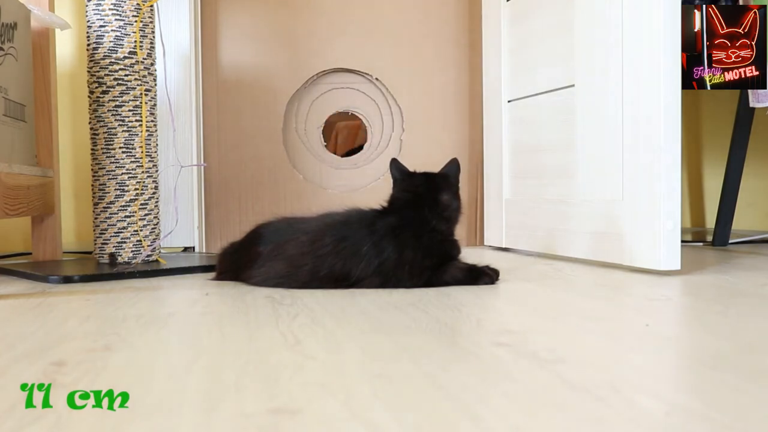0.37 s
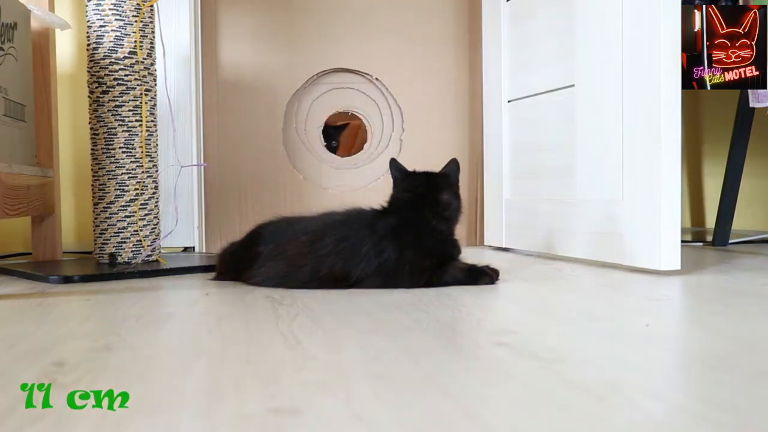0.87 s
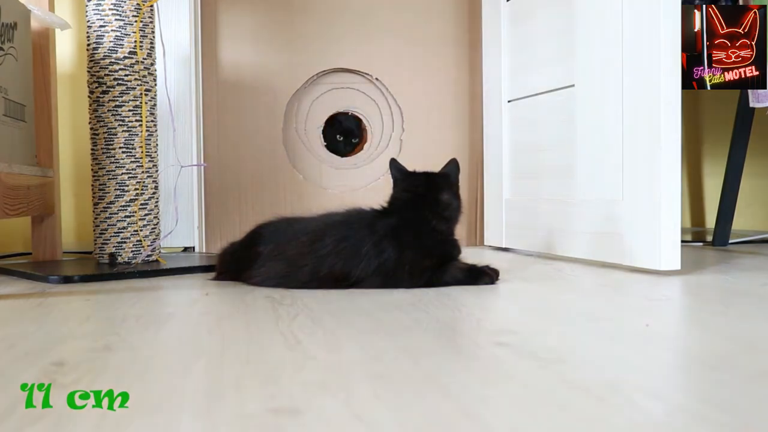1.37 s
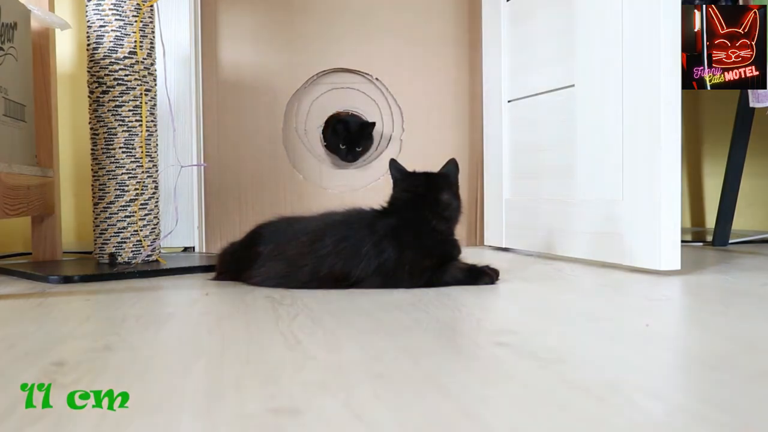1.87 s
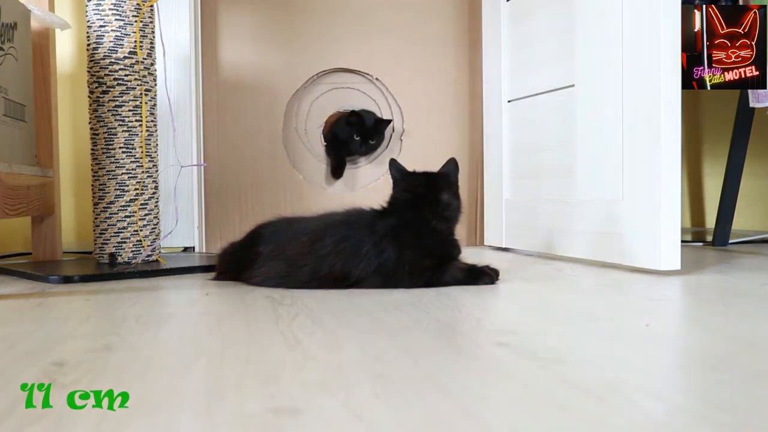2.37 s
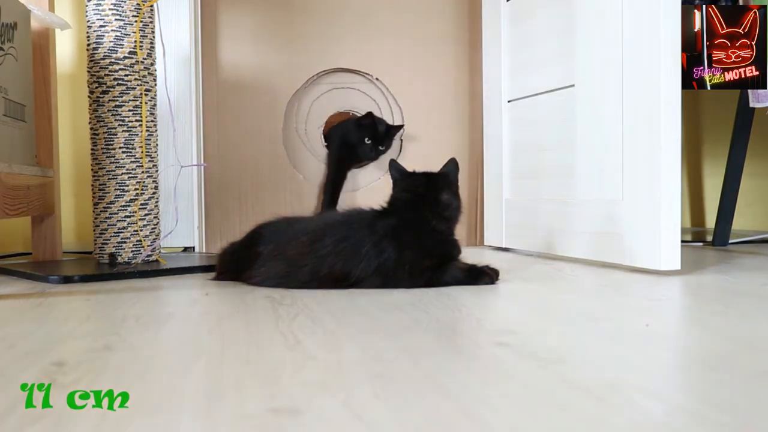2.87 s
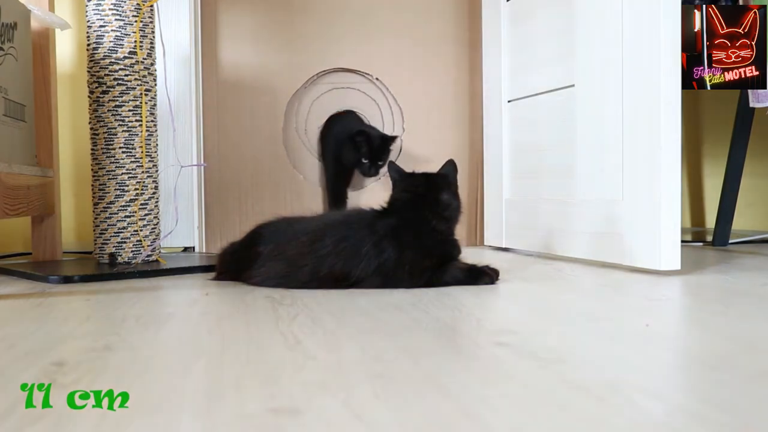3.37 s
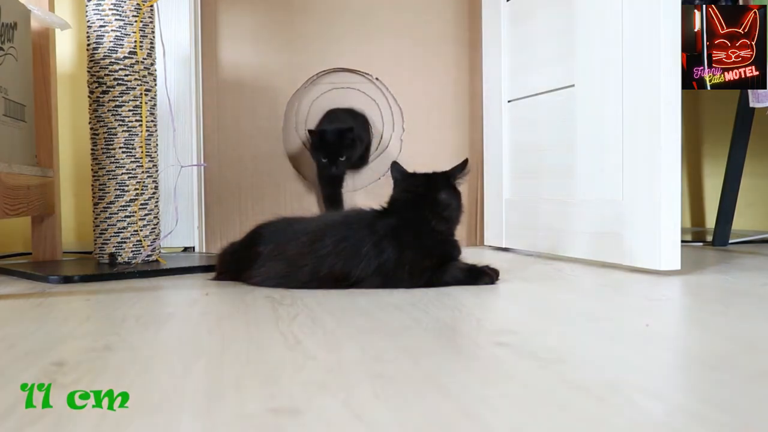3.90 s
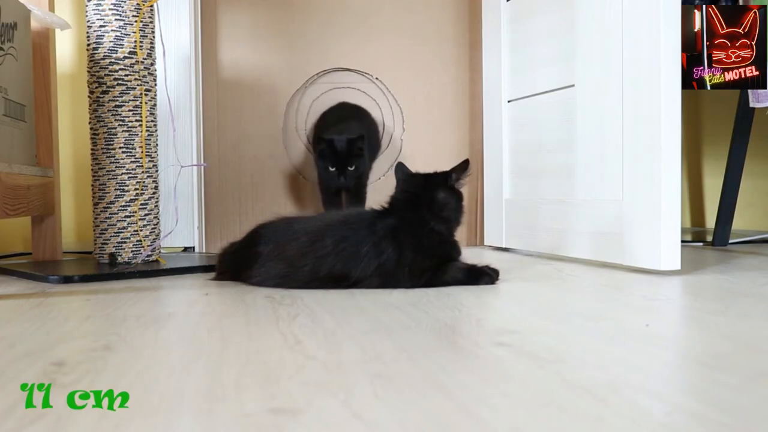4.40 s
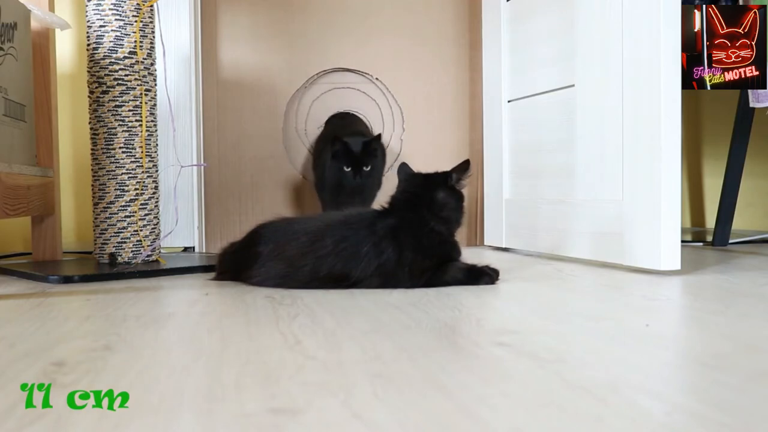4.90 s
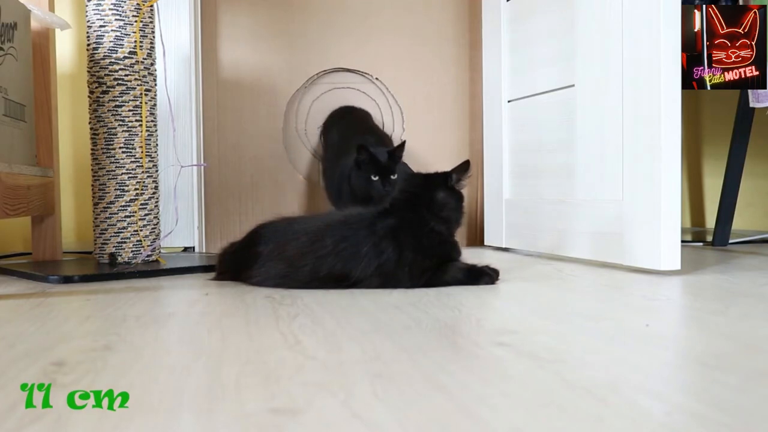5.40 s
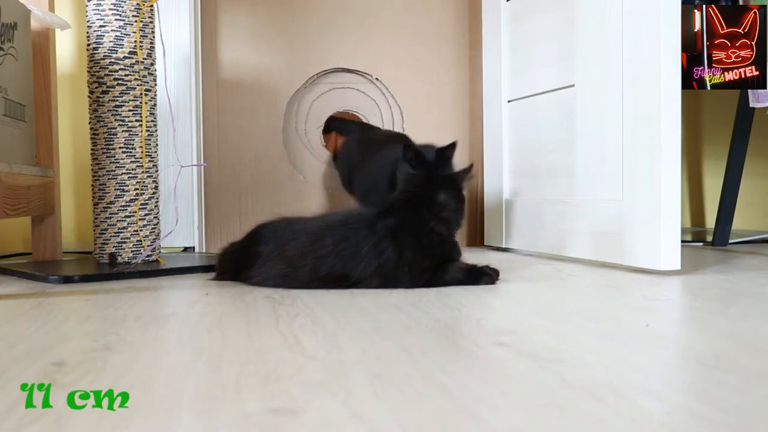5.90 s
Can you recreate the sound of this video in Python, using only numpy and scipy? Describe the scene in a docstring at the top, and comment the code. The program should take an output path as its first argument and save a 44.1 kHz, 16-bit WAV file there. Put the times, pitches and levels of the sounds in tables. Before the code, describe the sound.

A cat squeezes through a tight hole in a cardboard panel. First only soft room tone, tiny ticks and low air movement; then boxy bumps, a quick rasp and a strong hollow knock. Coarse fur and card-edge scraping grows nearly continuous, broken by separate thuds and snapping fibres, ending in a cluster of knocks. Heard indoors from a floor-level stereo microphone, fairly dry.

```python
"""A faint brush of fur in a quiet small room opens into busier rubbing, knocks and ticks: a cat squeezes through
a tight hole in a cardboard panel in a doorway, a metre or two from a stereo microphone on the floor.
The rub is uneven noise from fur, scraped card edge and dragged panel; pushes ring the panel's modes as knocks,
and fibres at the rim tick as short pitched crackles. Behind lie low air swells, panel wobble and room tone."""
import sys
import numpy as np
from scipy import signal
from scipy.fft import rfft, irfft
from scipy.io import wavfile
from scipy.ndimage import uniform_filter1d

SR = 44100
rng = np.random.default_rng(int(sys.argv[2]) if len(sys.argv) > 2 else 0)


def materialize(psi):
    """Save the field psi as 16-bit PCM at rate SR to the path in sys.argv[1].

    A 1-D psi becomes a single channel; in a 2-D psi each row is a channel.
    """
    bounded = np.clip(np.atleast_2d(psi).T, -1, 1)
    quanta = np.round(bounded * 32767).astype(np.int16)
    wavfile.write(sys.argv[1], SR, quanta)


def voltage_ratio(decibels):
    """Convert decibels (scalar or array-like) to amplitude ratios, 20 dB per decade."""
    exponent = np.asarray(decibels, float) / 20
    return 10 ** exponent


N = 265482  # length in samples

# The coat slides over the rim: peak_s, half_length_s, fur_db, scrape_over_fur_db, drag_over_fur_db
COAT_STROKES = [(.15, .2, -70, -10, -5), (0.866, 0.082, -55.5, -7.5, -12), (0.96, .07, -59.5, -13, -5),
                (1.087, 0.027, -58.5, -2, -0.5), (1.306, 0.054, -57, -3.5, -11),
                (1.714, 0.023, -56, -6, -3), (1.848, 0.15, -56.5, -11, -13), (1.984, 0.13, -51, -9.5, -17),
                (2.12, 0.079, -54, -5, -8), (2.32, 0.084, -53.5, -4.5, -11), (2.459, 0.07, -50, -7.5, -13),
                (2.546, 0.044, -53, -8, -7), (2.68, 0.13, -53, -5.5, -19), (2.791, 0.076, -49.5, -0.5, 7),
                (2.926, 0.053, -39.5, -2, 3), (2.959, 0.023, -27.5, -2, -3), (3.042, 0.063, -41, -6, -1.5),
                (3.205, 0.11, -52.5, -2.5, -10), (3.302, 0.016, -44, -2.5, 8.5),
                (3.422, 0.099, -37, -6.5, -7.5), (3.518, 0.09, -36, -4.5, -18), (3.634, 0.055, -43.5, 3, 4),
                (3.708, 0.074, -34.5, 0.5, -2.5), (3.8, 0.022, -29.5, -5.5, -0.5),
                (3.907, 0.13, -44.5, -2.5, -3.5), (4.071, 0.1, -41.5, -2, -5), (4.191, 0.033, -40.5, 6, 3),
                (4.229, 0.04, -35, -3.5, -10), (4.383, 0.1, -34.5, -3, -6.5), (4.503, 0.048, -39.5, 0, 2.5),
                (4.595, 0.078, -31.5, 0.5, 0), (4.742, 0.13, -31, 1.5, 0.5),
                (4.888, 0.11, -31.5, 0.5, -1.5), (5.092, 0.084, -36.5, -3, -2), (5.194, 0.087, -31, 0, -7),
                (5.414, 0.1, -33, -2, -6), (5.545, 0.079, -31.5, -3, -5), (5.686, 0.097, -39.5, -3.5, -6.5),
                (5.776, 0.051, -35, -0.5, -3), (5.85, .04, -39.5, -1, -3), (5.91, 0.056, -33.5, -1, -9),
                (6.01, 0.039, -34.5, -8.5, 2)]
# Spectrum of the scraping card edge: frequency_hz, relative_level_db
SCRAPE_SPECTRUM = [(590, -25), (1000, 1), (1130, -2.5), (1410, 1.5), (1720, -2.5), (2150, -0.5), (3030, 0),
                   (3450, -2.5), (4410, -4.5), (5320, -11), (6000, -15), (7800, -50), (13200, -120)]
# Spectrum of the panel droning under the drag: frequency_hz, relative_level_db
DRAG_SPECTRUM = [(59, -38), (100, -9.5), (226, 2.5), (276, -1.5), (402, 0.5), (501, -1), (646, -1),
                 (1400, -12.5), (1820, -23), (3080, -120)]
# Spectrum of the fine fur hiss: frequency_hz, relative_level_db
FUR_SPECTRUM = [(2940, -15.5), (5000, -9.5), (5400, -10.5), (6600, -3), (10400, -5.5), (13200, -5),
                (14000, -9.5), (16000, -23.5)]
# Pushes of the panel against its frame, a few rows being strong rebounds of the blow just before (3.4856 s,
# 5.9014 s): start_s, blow_db, contact_ms, favoured_mode_hz, favoured_gain_db
PANEL_KNOCKS = [(0.765, -43.5, 0.52, 61.2, 21.5), (1.701, -37, 2.53, 60, 5), (2.585, -29, 2.4, 116, 16.5),
                (2.7246, -10, 1.04, 70, -5), (2.9982, -14.5, 2, 110, 20.5), (3.13, -21.5, 2.05, 116, -12),
                (3.2956, -26, 0.17, 700, 3), (3.4548, -1, 0.78, 157, 0.5), (3.4856, -8, 0.62, 157, 3.5),
                (3.52, -15.5, 0.79, 417, 4), (3.553, -17, 0.61, 417, -5), (3.786, -19, 2.2, 1000, 21),
                (3.951, -9.5, 0.8, 70.5, 1.5), (4.3136, -13.5, 0.76, 70, 2.5), (5.2869, -11, 0.98, 70.4, 0),
                (5.6614, -12.5, 0.88, 70, 0.5), (5.8706, -13.5, 0.82, 160, -4),
                (5.9014, -19.5, 0.86, 160, -2), (6.0132, -12, 0.78, 395, 15)]
# Ringing modes of the panel: pitch_hz, level_db, t60_s, first_swing (+1 or -1, towards or away from the microphone)
PANEL_MODES = [(38.8, -10.5, 0.31, 1), (70.7, -9.5, 0.22, -1), (116, -22.5, 0.3, 1), (157.9, -4, 0.3, -1),
               (214, -7.5, 0.12, -1), (249, -9, 0.09, 1), (309.5, 3.5, 0.043, 1), (394.3, -2.5, 0.12, -1),
               (433.5, -6.5, 0.18, 1), (497, 2.5, 0.083, -1), (512, 2, 0.066, 1), (556, 5.5, 0.043, 1),
               (631, 2.5, 0.068, 1), (712, -9.5, 0.232, 1), (878, -2, 0.048, -1), (1096, -8.5, 0.045, 1),
               (1400, 5, 0.035, -1)]
# Fibres and creases at the rim: start_s, peak_db, pitch_hz, left_minus_right_db, crackle_ms
RIM_TICKS = [(.1285, -46, 6900, -1, 4.1), (.1755, -49, 10000, 0, 1.5), (.3267, -50, 1880, -3, 12),
             (.458, -52, 1490, 0, 5.3), (0.659, -49, 2070, -.5, 7.3), (.7243, -42, 10000, 0, .8),
             (0.7669, -40.5, 900, -7, 0.19), (.9514, -47, 3000, 10.5, 2.6), (1.0894, -51, 3200, -.5, 4.9),
             (1.4462, -36, 8600, 0, 0.4), (1.7189, -44, 9000, 1, 2.9), (1.97, -45, 3500, -3, 8.9),
             (2.7537, -31, 1500, -5, 1.7), (2.766, -24.5, 1300, -4, 3), (2.772, -31, 4000, -4, 1.8),
             (2.7925, -24.5, 1700, 1, 1.6), (2.865, -30.5, 1400, 0, 2.2), (2.8946, -31, 1090, -2, 4),
             (2.9311, -40, 1300, 2, 2), (2.9536, -22, 4200, -1, 4.9), (3.053, -31, 1293, 2.5, 0.95),
             (3.083, -32.5, 1190, 0, 3.7), (3.265, -33, 6300, 2, 1.15), (3.2978, -31, 2900, -7, 2.3),
             (3.7889, -18.5, 940, -2, 2.5), (3.789, -28.5, 2400, 1.5, 2.2), (3.8085, -24, 7000, 0, 4),
             (4.9234, -12.5, 6800, -9, 1.16), (4.9309, -20, 5500, -1, 0.98), (5.554, -23, 885, -1, 1.1),
             (5.9907, -18.5, 1470, -3, 2.1), (5.9965, -23.5, 910, 9, 2.2), (6.0134, -13, 1480, -2, 7.6),
             (6.0145, -18, 8000, -3, 2.7)]
# How strongly the body shifts the air: time_s, heave_db
BODY_MOVEMENT = [(0.0, -45), (0.72, -48), (1.02, -24), (1.24, -25), (1.31, -36), (2.04, -31), (2.09, -51),
                 (2.25, -30), (2.72, -58), (2.8, -23.5), (3.08, -22.5), (3.14, -39), (3.5, -29.5),
                 (3.82, -29.5), (3.87, -50), (4.17, -19), (4.38, -28), (5.4, -23.5), (5.52, -50),
                 (5.58, -21), (5.68, -33), (5.85, -24), (5.97, -24), (6.02, -36)]
# Spectrum of the pressure swells: frequency_hz, relative_level_db
HEAVE_SPECTRUM = [(2, -14), (7, 0), (13, -7), (22, -15), (35, -32), (60, -60)]
# Spectrum of the low panel wobble: frequency_hz, relative_level_db
WOBBLE_SPECTRUM = [(15, -16), (25, 6), (40, 2), (70, -10), (115, -9), (158, -9.5), (200, -26.5)]
# Spectrum of the indoor hush: frequency_hz, relative_level_db
ROOM_TONE_SPECTRUM = [(15, -22), (25, 3.5), (70, -17.5), (149, -10.5), (206, -14), (344, -13.5),
                      (463, -20.5), (840, -28), (1130, -29.5), (1440, -34.5), (7710, -36.5), (14800, -45.5),
                      (16000, -43.5)]
# Response difference of the two capsules: frequency_hz, left_minus_right_db
CAPSULE_BALANCE = [(60, -1.5), (110, -3), (200, 1.5), (380, -1.5), (700, 0.5), (1290, -0.5), (2380, -1.5),
                   (4400, -1.5), (8120, -1), (15000, 4)]


def level(x, db):
    """Scale to an rms level."""
    return x * voltage_ratio(db) / np.sqrt(np.mean(x ** 2))


def colour(x, points):
    """Filter by (Hz, dB) points joined on a log frequency axis, nearly silent outside them."""
    hz, db = np.transpose(points)
    axis = np.arange(N // 2 + 1) * SR / N + 1e-3
    gain_db = np.interp(np.log(axis), np.log(hz), db, left=-120, right=-120)
    return irfft(rfft(x) * voltage_ratio(gain_db), N)


def walk(rate):
    """Random levels held 1 / rate s and slewed twice; spread near 1."""
    hold = int(SR / rate)
    steps = np.repeat(rng.standard_normal(N // hold + 1), hold)
    slewed = uniform_filter1d(uniform_filter1d(steps, hold), hold)
    return 1.3 * slewed[:N]


def pair(make, width):
    """Left and right from a shared and an opposed part; width 1 is unrelated."""
    shared = make()
    opposed = np.array([[1], [-1]]) * make()
    return (shared + width * opposed) / np.sqrt(1 + width ** 2)


def add(out, s, sound):
    """Mix a short sound in at a time."""
    i = int(s * SR)
    n = max(min(sound.shape[-1], N - i), 0)
    out[..., i:i + n] += sound[..., :n]


def slips(scatter_db, patchy_db, rate):
    """Countless hairs that catch and let go: mostly small slips, a few larger, in uneven patches."""
    size = np.minimum(rng.exponential(size=N), 5)
    return rng.standard_normal(N) * voltage_ratio(scatter_db * size + patchy_db * walk(rate))


def strokes(over_db):
    """Rms envelope of all strokes, each raised by its own amount; a stroke swells and fades as a bell."""
    resting_db = -74.5  # the coat never lies quite still
    t = np.arange(N) / SR
    coarse_t = t[::32]
    peak_s, half_s, db = np.transpose(COAT_STROKES)[:3, :, None]
    peak_power = voltage_ratio(2 * (db + np.reshape(over_db, (-1, 1))))
    bells = peak_power * np.exp(-2 * ((coarse_t - peak_s) / half_s) ** 2)
    return np.interp(t, coarse_t, np.sqrt(voltage_ratio(2 * resting_db) + bells.sum(axis=0)))


def shimmer(x, depth_db, hz, ms):
    """The colour of a rub keeps shifting: neighbouring bands swell and fade on their own."""
    z = signal.stft(x, nperseg=256)[2]
    field = rng.standard_normal(z.shape[1:])
    # smooth twice across frequency bins, then twice across time frames
    for axis, span in enumerate([hz * 256 / SR, ms * SR / 128000]):
        size = int(span) + 1
        field = uniform_filter1d(uniform_filter1d(field, size=size, axis=axis), size=size, axis=axis)
    shifted = z * voltage_ratio(depth_db * field / field.std())
    return signal.istft(shifted, nperseg=256)[1][:, :N]


def rub():
    """Card edge scrapes, the panel drones under the drag, the finest hiss arrives from all round the rim."""
    bright_hz = 2700  # splits the scrape into dull and bright parts
    tilt_db, tilt_db_per_octave, usual_stroke_s = -1, 1, 0.045
    _, half_s, _, scrape_db, drag_db = np.transpose(COAT_STROKES)

    scrape = pair(lambda: level(colour(slips(scatter_db=3.0, patchy_db=0.5, rate=40), SCRAPE_SPECTRUM), 0),
                  width=0.075)
    dull = signal.filtfilt(*signal.butter(2, bright_hz, fs=SR), scrape)
    bright = scrape - dull
    # a quicker stroke shifts the scrape upwards
    bright_db = tilt_db + tilt_db_per_octave * np.log2(usual_stroke_s / half_s)
    scrape = strokes(scrape_db - bright_db / 2) * dull + strokes(scrape_db + bright_db / 2) * bright

    drag = pair(lambda: level(colour(slips(scatter_db=5, patchy_db=0.5, rate=23), DRAG_SPECTRUM), 0),
                width=0.036)
    fur = pair(lambda: level(colour(slips(scatter_db=3.0, patchy_db=-0.5, rate=24), FUR_SPECTRUM), 0),
               width=0.86)
    rubbing = scrape + strokes(drag_db) * drag + strokes(0) * fur
    return shimmer(rubbing, depth_db=1.3, hz=1100, ms=70)


def knocks():
    """A soft push and one rebound ring the same panel modes; longer contact is duller; the loose edge rattles on."""
    rebound_ms, rebound_db = 28.5, -13
    rattle_db, rattle_db_per_ms = -21, -4.5  # the loose edge rattles less under a longer contact
    t = np.arange(SR // 2) / SR
    out = np.zeros((2, N))
    buzz = signal.butter(1, [170, 750], "band", fs=SR, output="sos")
    chances = rng.standard_normal((len(PANEL_KNOCKS), 2, len(t)))
    for (s, db, contact_ms, near_hz, near_db), chance in zip(PANEL_KNOCKS, chances):
        ring = np.zeros(len(t))
        for hz, mode_db, t60, sign in PANEL_MODES:
            # modes close to the favoured pitch take the extra gain
            favour_db = near_db * np.exp(-np.log(hz / near_hz) ** 2 / .03)
            ring += (np.sign(sign) * voltage_ratio(mode_db + favour_db)
                     * np.sin(2 * np.pi * hz * t) * 1000. ** (-t / t60))
        u = t[:SR // 40] * 1000 / contact_ms
        push = u * np.exp(-u)  # strongest at contact_ms
        blow = signal.fftconvolve(ring, push)[:len(t)]

        edge = chance[0] + 0.273 * np.array([[1], [-1]]) * chance[1]
        rattle = signal.sosfilt(buzz, signal.sosfilt(buzz, edge))
        rattle = level(rattle, rattle_db + rattle_db_per_ms * contact_ms)
        rattle_shape = np.minimum(t / 0.0047, 1) * np.exp(-t / 0.062)
        knock = voltage_ratio(db) * (blow / np.abs(blow).max() + rattle * rattle_shape)
        add(out, s, knock)
        add(out, s + rebound_ms / 1000, voltage_ratio(rebound_db) * knock)
    return out


def ticks():
    """A fibre snaps: a sharp start and a brief decaying crackle around its own pitch."""
    t = np.arange(SR // 20) / SR
    out = np.zeros((2, N))
    cracks = rng.standard_normal((len(RIM_TICKS), len(t)))
    for (s, db, hz, pan_db, ms), crack in zip(RIM_TICKS, cracks):
        # a long crackle settles on a narrower pitch than a dry snap
        spread = 1 + 1.6 / (1 + ms)
        band = signal.butter(2, [hz / spread, min(hz * spread, .45 * SR)], "band", fs=SR, output="sos")
        snap = signal.sosfilt(band, np.sign(crack) * np.exp(-1000 * t / ms))
        sides_db = db + np.array([[pan_db], [-pan_db]]) / 2
        add(out, s, snap / np.abs(snap).max() * voltage_ratio(sides_db))
    return out


def sway():
    """Slow pressure swells from the moving body and the low wobble of the leaned-on panel."""
    rest_db, air_db, rub_db = -53.5, -24, -2
    # the wobble after a knock grows less than in proportion to the blow
    knock_db, knock_share, knock_rise_s = -20.5, 0.71, 0.037
    time_s, heave_db = np.transpose(BODY_MOVEMENT)
    movement = voltage_ratio(np.interp(np.arange(N) / SR, time_s, heave_db))
    heave = pair(lambda: colour(rng.standard_normal(N), HEAVE_SPECTRUM), width=.3)
    # the swells keep an even size, so the movement alone sets their strength
    heave /= np.sqrt(uniform_filter1d(np.mean(heave ** 2, axis=0), size=SR // 4))

    wobble = pair(lambda: level(colour(slips(scatter_db=0, patchy_db=3.5, rate=9), WOBBLE_SPECTRUM), 0),
                  width=0.15)
    # the panel wobbles at rest, with the moving air, under the rubbing coat and after each knock
    power = voltage_ratio(2 * rest_db) + (voltage_ratio(air_db) * movement) ** 2 + (voltage_ratio(rub_db) * strokes(0)) ** 2
    u = np.arange(SR // 2) / SR / knock_rise_s
    for s, db, *_ in PANEL_KNOCKS:
        after_knock = voltage_ratio(knock_share * db + knock_db) * u * np.exp(1 - u)
        add(power, s, after_knock ** 2)
    return movement * heave + np.sqrt(power) * wobble


def room(near):
    """Short diffuse tail; long waves reach both sides alike, short ones differ."""
    t60_s, tail_db = .42, -8
    t = np.arange(SR // 2) / SR
    fade = 1000. ** (-t / t60_s) * np.minimum(t / 0.024, 1)
    mid, side = rng.standard_normal((2, len(t))) * fade
    side = signal.lfilter(*signal.butter(1, 350, "high", fs=SR), side)
    tail = np.array([mid + side, mid - side])
    tail *= voltage_ratio(tail_db) / np.sqrt(np.sum(tail ** 2) / 2)
    return signal.fftconvolve(near, tail, axes=1)[:, :N]


def room_tone():
    """Steady indoor hush: shaped noise, partly shared between the sides."""
    return pair(lambda: level(colour(rng.standard_normal(N), ROOM_TONE_SPECTRUM), -48.5), width=0.52)


def scene():
    """Panel sounds with their room tail, over sway and room tone."""
    near = knocks() + ticks() + rub()
    return near + room(near) + sway() + room_tone()


def low_pass(x):
    """Removes everything above the highest recorded frequency."""
    return signal.sosfilt(signal.butter(12, 16510, fs=SR, output="sos"), x)


def record(dry):
    """A stereo microphone with slightly unequal capsules and softly rounded peaks."""
    # hold the end values out to the edges of hearing and beyond
    balance = [(0.93, CAPSULE_BALANCE[0][1])] + list(CAPSULE_BALANCE) + [(SR, CAPSULE_BALANCE[-1][1])]
    left = colour(dry[0], [(hz, db / 2) for hz, db in balance])
    right = colour(dry[1], [(hz, -db / 2) for hz, db in balance])
    mix = np.tanh(0.62 * np.array([left, right])) / 0.58
    return low_pass(mix)


dry = scene()
out = record(dry)
materialize(out)
```